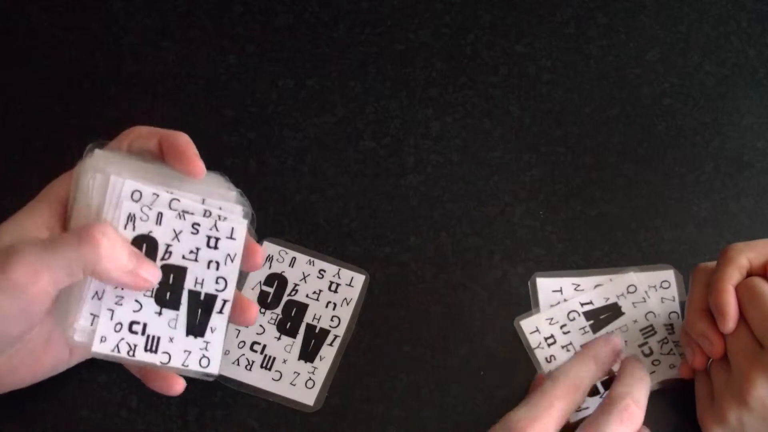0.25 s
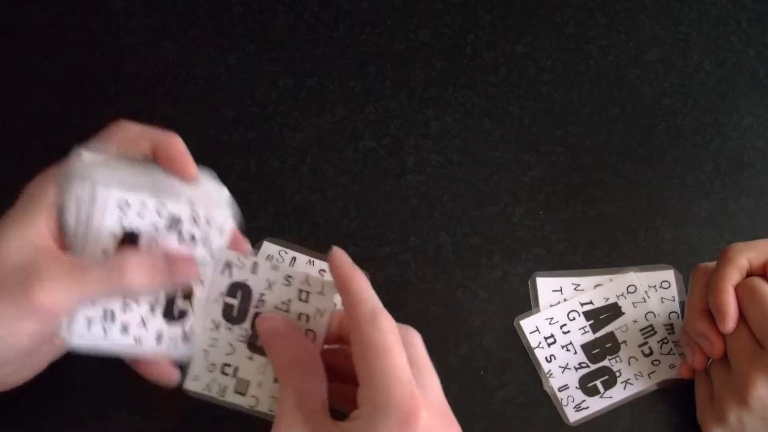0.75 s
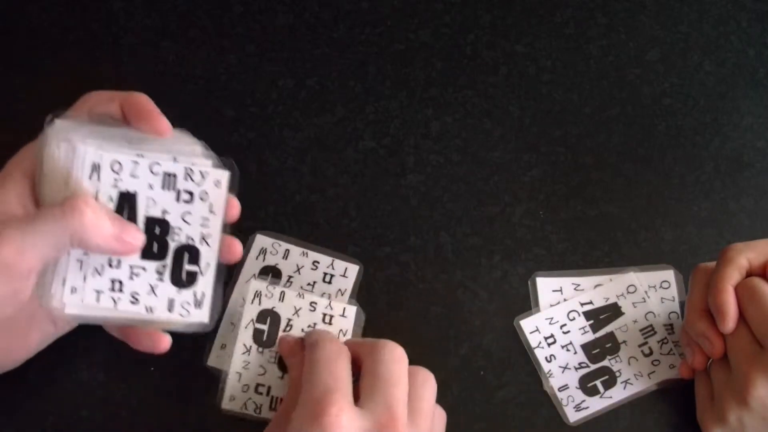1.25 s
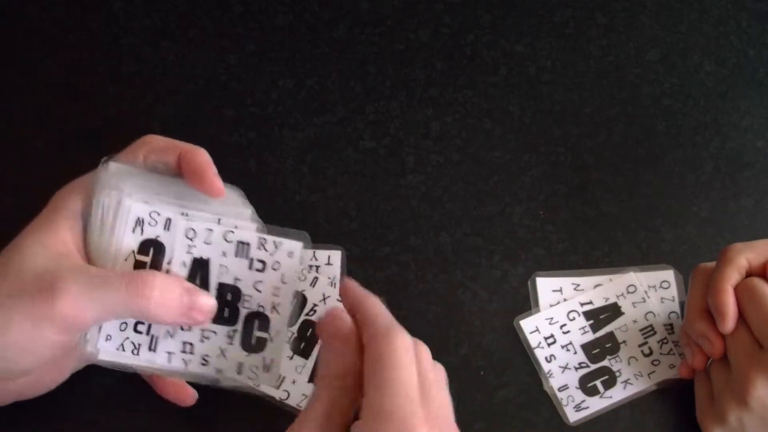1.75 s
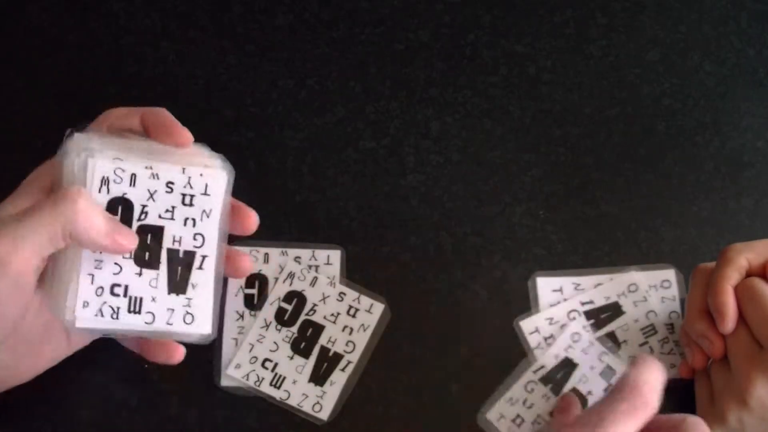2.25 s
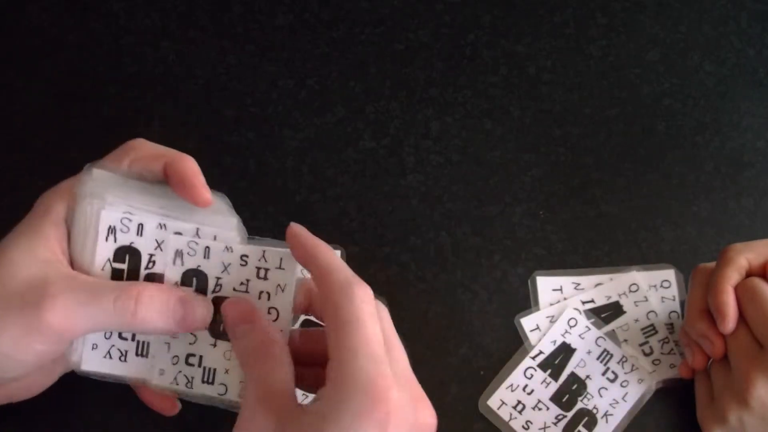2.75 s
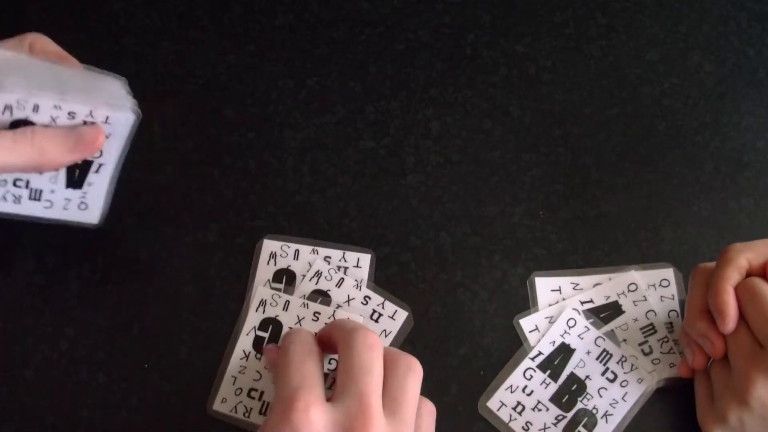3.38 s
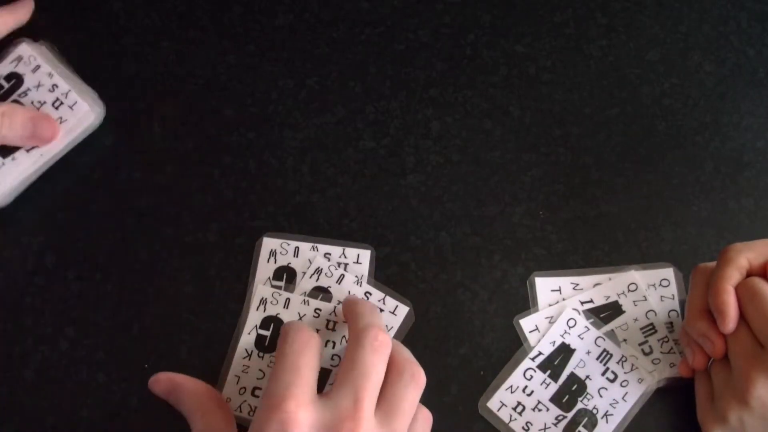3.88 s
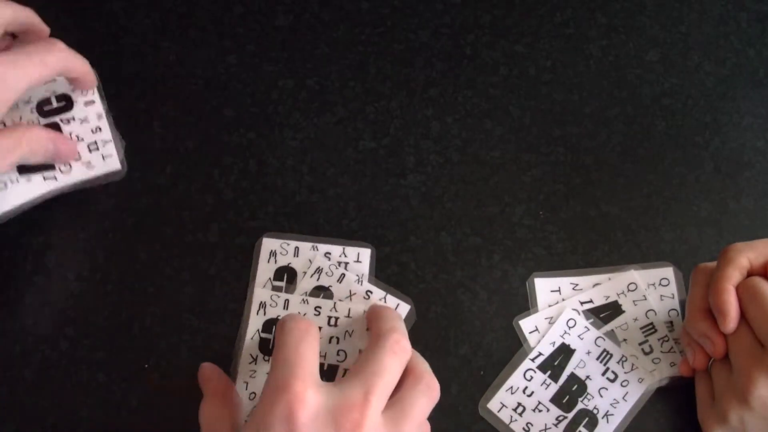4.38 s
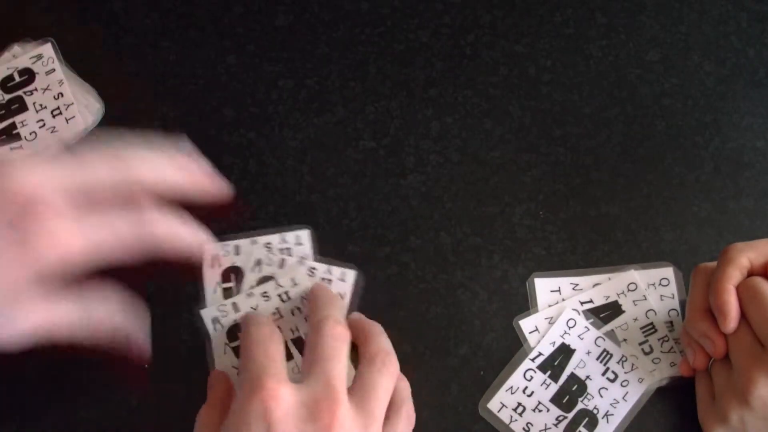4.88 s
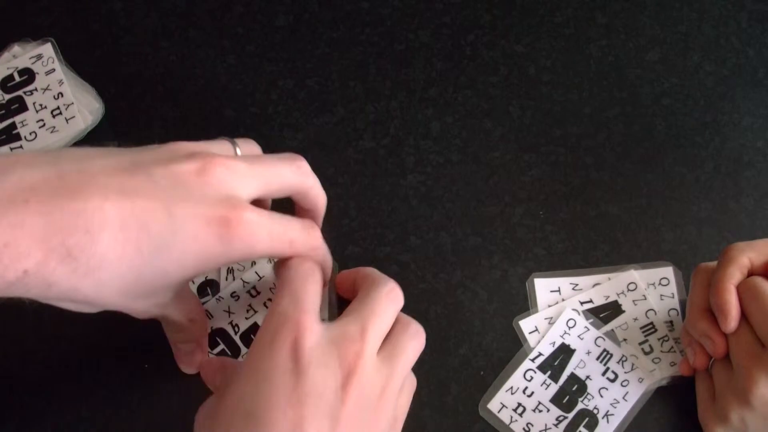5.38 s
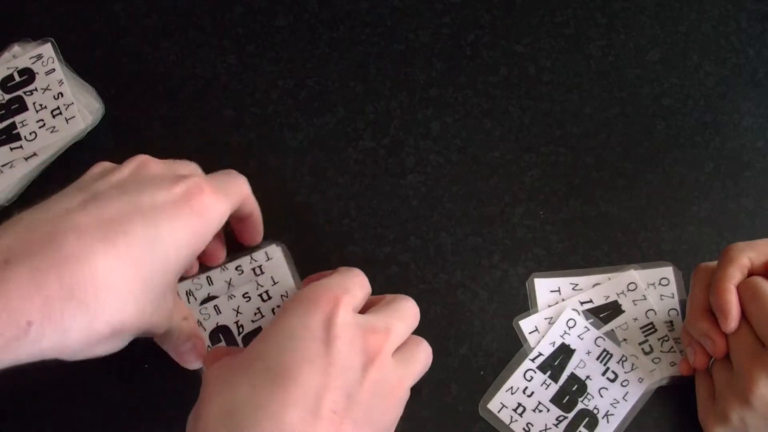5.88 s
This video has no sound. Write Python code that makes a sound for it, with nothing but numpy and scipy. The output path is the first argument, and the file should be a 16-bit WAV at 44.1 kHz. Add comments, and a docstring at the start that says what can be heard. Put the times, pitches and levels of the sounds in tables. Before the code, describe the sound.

Close and dry in a small room: brief glossy swishes and plastic snaps as cards leave a deck, papery flaps and bright clicks as they meet the table. Three quick clusters of dealing give way to sparse rubbing, a firm knock near five seconds, then dull shuffling and pressing of the pile. Barely noticeable squeaks and a low, even background hiss.

```python
"""Laminated cards are dealt from a hand-held deck onto a table, then slid together and squared up.
The place is a small room, the cards straight below a pair of microphones.
Stiff edges snap off the deck as short rim rings with cracks, and bent sheets ring in damped modes.
Cards and fingertips knock the table's modes; plastic faces rub in short strokes of filtered friction noise.
Sparse squeaks glide through, early and late reflections surround it all, and a soft steady hiss lies below."""
import sys
import numpy as np
from scipy import signal
from scipy.fft import rfft, irfft, next_fast_len
from scipy.io import wavfile

SR = 44100
rng = np.random.default_rng(int(sys.argv[2]) if len(sys.argv) > 2 else 0)


def transcribe(signal):
    """Save signal, clipped to [-1, 1], as a 16-bit WAV file at the path in sys.argv[1]."""
    frames = np.atleast_2d(signal).T
    limited = np.clip(frames, -1, 1)
    pcm = np.round(limited * 32767).astype(np.int16)
    wavfile.write(sys.argv[1], SR, pcm)


N = 270333
TIME = np.arange(N) / SR
BLOW_TIME = TIME[:SR // 7]   # time axis of one contact
CUTOFF_HZ = 16300   # top of the microphone signal
BAND_EDGES_HZ = np.geomspace(22, 17500, 25)
BANDS = [(np.sqrt(low * high), signal.butter(2, [low, high], "band", fs=SR, output="sos"))
         for low, high in zip(BAND_EDGES_HZ, BAND_EDGES_HZ[1:])]
SHEET_TO_EDGE = 0.424   # in a snap the sheet bends at this share of the edge's pitch
SOFT_EDGE_HZ = 3350     # rim pitch in pops and fingertip taps


def from_db(db):
    """Decibels to gain."""
    return 10 ** (np.asarray(db) / 20)


def rms_one(x):
    """Scale to rms 1."""
    return x / np.sqrt(np.mean(x ** 2) + 1e-20)


def at_hz(points, hz):
    """Read a table on a log-frequency axis."""
    table_hz, values = np.array(points).T
    return np.interp(np.log(hz), np.log(table_hz), values)


def cut(x, hz, kind):
    """Second-order low-pass or high-pass."""
    return signal.sosfilt(signal.butter(2, min(hz, .45 * SR), kind, fs=SR, output="sos"), x)


def drift(rate):
    """Random wander of spread near 1, with about rate new values a second joined by straight lines."""
    steps = rng.standard_normal(N // 8)
    return np.interp(TIME * rate, np.arange(len(steps)), steps)


def colour(x, spectrum):
    """Causal (minimum-phase) filter with the given spectrum, built by folding its cepstrum."""
    size = 2 * next_fast_len(x.shape[-1] // 2 + 512)
    hz = np.maximum(np.fft.rfftfreq(size, 1 / SR), 1)
    cepstrum = irfft(np.log(from_db(at_hz(spectrum, hz))))
    cepstrum[1:size // 2] *= 2
    cepstrum[size // 2 + 1:] = 0
    response = np.exp(rfft(cepstrum))
    return irfft(rfft(x, size) * response, size)[..., :x.shape[-1]]


def stereo_bands(likeness, size):
    """Yields (Hz, stereo noise) band by band, left and right as alike as the table says."""
    white = rng.standard_normal((2, 2, size))
    for k, (hz, sos) in enumerate(BANDS):
        mid, side = signal.sosfilt(sos, white[k % 2])   # neighbouring bands use separate noise
        alike = np.clip(at_hz(likeness, hz), -1, 1)
        yield hz, np.sqrt(1 + alike) * mid + np.sqrt(1 - alike) * side * [[1], [-1]]


def ring(hz, t60):
    """A struck mode: a sine that falls 60 dB in t60 seconds."""
    return np.sin(2 * np.pi * hz * BLOW_TIME) * from_db(-60 * BLOW_TIME / t60)


def crack(t60):
    """A decaying noise burst for the micro-slips where two hard edges meet."""
    return rng.standard_normal(len(BLOW_TIME)) * from_db(-60 * BLOW_TIME / t60)


def blow(x, db):
    """Give a short sound the energy of 5 ms at this level."""
    return from_db(db) * x / np.sqrt(np.sum(x ** 2) / (.005 * SR) + 1e-20)


def add(track, s, sound):
    """Mix a sound in at time s."""
    start = int(np.clip(round(s * SR), 0, N - 1))
    track[start:start + len(sound)] += sound[:N - start]


# steady hiss, its spectrum: [f/Hz, level/dB]
HISS_SPECTRUM = [(15, -61), (25, -32.5), (53, -29), (114, -13), (242, -8), (301, -5), (714, -2),
                 (818, -4.5), (962, -4), (1650, -7), (2610, -13), (3820, -13.5), (5880, -17.5),
                 (12500, -20.5), (16000, -33)]
# its likeness between the two microphones: [f/Hz, correlation]
HISS_LIKENESS = [(60, -0.51), (180, -0.74), (550, -0.59), (1650, -0.31), (4970, -0.044), (15000, 0.062)]


def background(level_db):
    """Steady hiss of the room and the microphones: noise weighted band by band, partly shared by both sides."""
    noise = 0
    for hz, band in stereo_bands(HISS_LIKENESS, N):
        noise = noise + from_db(at_hz(HISS_SPECTRUM, hz)) * band
    return from_db(level_db) * rms_one(noise)


def friction(catches_per_s, size_db, smooth_db):
    """Tiny catches of uneven size over smooth rubbing; the finger pressure judders by about a decibel."""
    sizes = from_db(size_db * np.minimum(rng.exponential(1, N), 4))
    signed_sizes = sizes * rng.choice([-1, 1], N)
    grains = signed_sizes * (rng.random(N) < catches_per_s / SR)
    smooth = from_db(smooth_db) * rng.standard_normal(N)
    return (rms_one(grains) + smooth) * from_db(drift(130))


# one card slides over another: [t/s of fastest motion, length/s, hiss level/dB, tilt/dB per octave]
CARD_STROKES = [(0.01, 0.04, -59, 1), (0.175, 0.39, -70.5, 0), (0.459, 0.15, -71, 1),
                (0.78, 0.19, -61.5, 2), (0.846, 0.04, -57, -2), (0.897, 0.026, -53.5, -9),
                (0.94, 0.14, -63, 2), (1.011, 0.031, -45.5, 0.5), (1.441, 0.038, -60, -1),
                (1.504, 0.062, -51, -7.5), (1.649, 0.054, -63.5, -9), (2.023, 0.064, -49, 2.5),
                (2.193, 0.039, -55, 0), (2.235, 0.094, -56, -4), (2.257, 0.015, -37.5, -3),
                (2.267, 0.026, -42.5, 3), (2.31, 0.053, -57, -6), (2.653, 0.23, -68, 1),
                (2.794, 0.057, -60, 0), (2.95, 0.045, -50, 1), (3.02, 0.026, -46.5, -7),
                (3.045, 0.036, -43.5, 5.5), (3.129, 0.11, -61, 1), (3.361, 0.079, -61.5, -5),
                (3.456, 0.038, -56.5, -5.5), (3.632, 0.17, -56.5, -3), (3.725, 0.06, -55.5, 3),
                (3.832, 0.025, -40.5, -1.5), (4.112, 0.06, -64.5, 2), (4.459, 0.17, -65.5, -4),
                (4.755, 0.25, -66.5, -12), (4.911, 0.14, -63.5, 7), (5.316, 0.075, -57, -4.5),
                (5.4, 0.08, -67, 2), (5.469, 0.09, -65, -12), (5.678, 0.13, -58, -11),
                (5.823, 0.096, -58, -11.5), (5.89, 0.23, -59.5, -2.5), (6.094, 0.072, -55.5, -7)]
# papery rub of the sheet: [f/Hz, level/dB per Hz]
RUB_SPECTRUM = [(100, -6.5), (200, -2), (400, -5.5), (700, -2), (1300, -1), (2000, 4), (3000, -11.5),
                (6000, -31.5)]
# hiss of the glossy surface: [f/Hz, level/dB per Hz]
GLOSS_SPECTRUM = [(1000, -32.5), (2000, 5.5), (3200, 4), (5000, 0.5), (8000, 1), (12000, -4.5),
                  (14000, -8.5), (16500, -21)]


def slides(rub_db, rub_per_tilt):
    """Card slides on card, speeding up and slowing down: the sheet radiates a rub, the glossy surface a hiss."""
    grain = friction(catches_per_s=1800, size_db=5.5, smooth_db=1.0)
    rub = rms_one(colour(grain, RUB_SPECTRUM))
    hiss = rms_one(colour(grain, GLOSS_SPECTRUM))
    out = np.zeros(N)
    for s, length, db, tilt in CARD_STROKES:
        half = length / 2   # speeding up takes as long as slowing down
        span = np.flatnonzero(np.abs(TIME - s) < 3 * half)
        phase = (TIME[span] - s) / half
        speed = from_db(-10 * np.abs(phase) ** 1.5)
        tilted_hiss = rms_one(colour(hiss[span], [(3000, -tilt), (12000, tilt)]))
        papery_rub = from_db(rub_db + rub_per_tilt * tilt) * rub[span]   # dull strokes rub more
        out[span] += from_db(db) * speed * (tilted_hiss + papery_rub)
    return out


# table top: [f/Hz, level/dB, t60/s]
TABLE_TOP = [(133, -11.5, 0.11), (228.6, 2.5, 0.045), (291, -5.5, 0.14), (331, -2.5, 0.042),
             (504, 1, 0.045), (683, -2.5, 0.029)]


def table_thud(spread_db, bass_hz):
    """Table modes ring with slightly random strengths; the soft contact rounds the start."""
    modes = 0
    for k, (hz, db, t60) in enumerate(TABLE_TOP):
        strength = from_db(db + spread_db * rng.normal())
        modes = modes + (-1) ** k * strength * ring(hz, t60)
    return cut(cut(modes, 1060, "low"), bass_hz, "high")


def table(db, bass_hz):
    """The table's answer to one contact, with its bass reduced below bass_hz."""
    return blow(table_thud(spread_db=1.5, bass_hz=bass_hz), db)


def sheet_flex(hz, t60, lower_db, upper_db, slap_db):
    """A released card swings in a well damped bending mode with a neighbour on either side, and slaps the air."""
    lower = from_db(lower_db) * ring(0.645 * hz, t60)
    upper = from_db(upper_db) * ring(1.72 * hz, 1.3 * t60)
    modes = ring(hz, t60) - lower - upper
    slap = cut(cut(crack(0.015), 1920, "low"), 600, "high")
    return cut(rms_one(modes) + from_db(slap_db) * rms_one(slap), 338, "high")


def sheet(hz, db):
    """The bending of the whole card."""
    return blow(sheet_flex(hz, t60=0.016, lower_db=-11.5, upper_db=-12, slap_db=-4.5), db)


def edge_click(hz, t60, grit_db, lower_db):
    """The stiff plastic rim rings for a few cycles, with a weaker mode below it, over a gritty crack."""
    rim = ring(hz, t60) - from_db(lower_db) * ring(0.74 * hz, t60)
    grit = cut(cut(crack(0.0023), 6200, "low"), 1800, "high")
    return cut(rms_one(rim) + from_db(grit_db) * rms_one(grit), 2060, "high")


# card rim, upper modes: [multiple of the lowest mode, level/dB]
RIM_UPPER_MODES = [(1.52, 14), (2.03, -16), (2.85, 2)]
# thin crack: [f/Hz, level/dB per Hz]
TICK_SPECTRUM = [(2500, -79), (5000, -2), (7000, 1.5), (8500, 4), (10000, -1), (12000, 2), (14500, -9),
                 (16500, -16)]


def bright_tick(hz, t60, ring_db):
    """A hard contact adds a thin crack and wakes the rim's upper modes."""
    upper = 0
    for ratio, db in RIM_UPPER_MODES:
        upper = upper + from_db(db) * ring(min(hz * ratio, CUTOFF_HZ), t60)
    thin_crack = rms_one(colour(crack(t60=0.003), TICK_SPECTRUM))
    return cut(thin_crack + from_db(ring_db) * rms_one(upper), 4100, "high")


# gritty skid of the rim: [f/Hz, level/dB per Hz]
SKID_SPECTRUM = [(600, -19), (2000, 4.5), (3200, -15), (5000, -2.5), (8000, 4), (12500, -1.5), (16000, -16)]


def edge(hz, db, tick_db):
    """The rim's click, the bright tick on top of it and the short gritty skid that follows."""
    # ticks above a middling -37.5 dB are brighter, those below it duller
    top_db = np.clip(1.2 * (tick_db + 37.5), -5, 5)
    click = edge_click(hz, t60=0.0063, grit_db=-5, lower_db=-26)
    tick = colour(bright_tick(hz, t60=0.006, ring_db=-5.5), [(7000, 0), (12000, top_db)])
    skid_rise = 1 - np.exp(-BLOW_TIME / 0.0027)
    skid = colour(crack(t60=0.092), SKID_SPECTRUM) * skid_rise
    return blow(click, db) + blow(tick, tick_db) + blow(skid, tick_db - 8.5)


# a fingertip comes down on the pile; the first row is a low thump as the scene opens: [t/s, table level/dB]
FINGER_TAPS = [(0.008, -60.5), (2.2168, -53.5), (2.3199, -55), (3.85, -49.5), (4.7331, -57),
               (5.2225, -53.5), (5.3032, -44), (5.5034, -51.5), (5.7238, -52.5)]


def taps():
    """A soft knock on the table through the pile that hardly wakes the rims, mostly from a fingertip."""
    out = np.zeros(N)
    for s, db in FINGER_TAPS:
        add(out, s, table(db, bass_hz=104))
        add(out, s, sheet(720, db - 6))
        add(out, s, edge(SOFT_EDGE_HZ, db - 30, db - 17))
    return out


def catches(per_s, mean_db, spread_db, low_hz, high_hz, sheet_db, tick_db):
    """Corners catch at random while cards slide: at most two tiny snaps a stroke, likelier the longer it lasts."""
    out = np.zeros(N)
    for s, length, _, _ in CARD_STROKES:
        for chance, place, size, pitch in rng.random((2, 4)):
            if chance >= per_s * length / 2:
                continue
            level = mean_db + spread_db * (2 * size - 1)
            hz = low_hz * (high_hz / low_hz) ** pitch
            snap = edge(hz, level, level + tick_db) + sheet(SHEET_TO_EDGE * hz, level + sheet_db)
            add(out, s + length * (place - .5), snap)
    return out


# an edge slips off another card: [t/s, edge level/dB, edge f/Hz, sheet level/dB, bright tick level/dB]
EDGE_SNAPS = [(0.1944, -56, 5400, -73, -60), (0.8176, -47.5, 4140, -36.5, -44),
              (0.8735, -48, 3100, -69, -49), (1.0001, -41, 3700, -50, -64), (1.0115, -39.5, 7030, -60, -51),
              (1.2333, -58, 4860, -69, -72), (1.4743, -43, 3100, -48, -56), (1.4986, -51, 3300, -60, -68),
              (1.6398, -53.5, 3430, -72, -80), (2.0414, -52, 3100, -45, -57),
              (2.0445, -44.5, 4030, -47.5, -59), (2.155, -42.5, 2760, -40, -52.5),
              (2.1797, -55, 3600, -51, -68), (2.4078, -45.5, 3560, -64, -71),
              (2.951, -43.5, 3100, -41, -68), (3.0074, -46, 2670, -44, -52), (3.0228, -41, 4090, -42, -41),
              (3.3593, -50.5, 2880, -66, -49), (3.6143, -48, 3170, -51.5, -69),
              (3.745, -50, 3970, -52, -66), (3.831, -39.5, 5560, -61, -55), (4.3772, -50, 2630, -58, -48.5)]


def snaps():
    """An edge springs free: the shorter the free part, the higher both rim and sheet ring."""
    out = np.zeros(N)
    for s, db, hz, sheet_db, tick_db in EDGE_SNAPS:
        add(out, s, edge(hz, db, tick_db))
        add(out, s, sheet(SHEET_TO_EDGE * hz, sheet_db))
        add(out, s, table(db - 21.5, bass_hz=300))
    return out


# sliding squeaks: [t/s of fastest motion, half length/s, level/dB, start f/Hz, end f/Hz]
CARD_SQUEAKS = [(0.425, 0.047, -69, 8180, 8600), (0.771, 0.012, -47.5, 1380, 1440),
                (4.352, 0.27, -65.5, 2230, 2194), (6.01, 0.085, -62.5, 5500, 4150)]


def squeaks(width_hz):
    """Plastic sticks and slips almost regularly: a faint, broken line glides as the card's free length changes."""
    out = np.zeros(N)
    for s, half, db, start_hz, end_hz in CARD_SQUEAKS:
        hz = np.interp(TIME, [s - half, s + half], [start_hz, end_hz])
        speed = np.exp(-np.minimum(((TIME - s) / half) ** 2, 20))
        line = np.sin(2 * np.pi * np.cumsum(hz) / SR)
        out += from_db(db) * speed * drift(width_hz) * drift(60) * line
    return out


# a card bends and pops as it is drawn off the deck: [t/s, sheet level/dB, sheet f/Hz, bright tick level/dB]
SHEET_POPS = [(0.6192, -54, 823, -64.5), (0.7126, -53.5, 1270, -69), (0.817, -34, 660, -42.5),
              (0.8489, -37.5, 1330, -52), (0.8879, -40, 1460, -52), (0.893, -37.5, 1250, -68),
              (1.9666, -46, 1110, -56), (2.7, -47.5, 1040, -67), (2.7061, -51, 1377, -62),
              (2.7578, -40, 940, -47.5), (2.789, -43.5, 1220, -69), (2.8409, -52.5, 1161, -80),
              (2.934, -49, 800, -68), (3.5117, -54.5, 630, -60.5)]


def pops():
    """A bent card springs back: mostly sheet, with a little rim and table."""
    out = np.zeros(N)
    for s, db, hz, tick_db in SHEET_POPS:
        add(out, s, sheet(hz, db))
        add(out, s, edge(SOFT_EDGE_HZ, db - 24, tick_db))
        add(out, s, table(db - 27.5, bass_hz=335))
    return out


# a card is slapped or pressed onto the table:
# [t/s, table level/dB, sheet level/dB, sheet f/Hz, edge level/dB, edge f/Hz, bright tick level/dB]
TABLE_SLAPS = [(1.0157, -50.5, -49, 1500, -44.5, 5800, -48), (1.5173, -36.5, -44, 820, -44.5, 3900, -43),
               (1.9396, -57, -44, 914, -44, 4020, -47), (2.2558, -62, -35, 2255, -35.5, 3200, -38),
               (2.2602, -36.5, -29, 1815, -27.5, 3090, -31), (3.0294, -62, -36, 1823, -30.5, 3150, -27),
               (3.0322, -35, -41.5, 1031, -34.5, 3970, -48), (3.1915, -44, -48.5, 1760, -36, 4355, -45.5),
               (3.215, -31.5, -42.5, 800, -41, 4800, -50.5), (3.3795, -53.5, -56.5, 1694, -53, 3660, -66),
               (3.8646, -50, -54, 815, -47, 2690, -46), (5.1038, -32.5, -41, 814, -37.5, 4420, -40),
               (5.9059, -48, -49, 1150, -48.5, 3350, -45.5)]


def slaps(heavy_bass_hz, light_bass_hz):
    """A card meets the table: flapping down it gives less bass than pressed by a finger."""
    out = np.zeros(N)
    for s, table_db, sheet_db, sheet_hz, edge_db, edge_hz, tick_db in TABLE_SLAPS:
        lightness = np.clip((sheet_db - table_db + 5) / 10, 0, 1)
        bass_hz = heavy_bass_hz + (light_bass_hz - heavy_bass_hz) * lightness
        add(out, s, edge(edge_hz, edge_db, tick_db) + sheet(sheet_hz, sheet_db))
        add(out, s + 0.00032, table(table_db, bass_hz))   # the table answers a moment later
    return out


# the pile is dragged over the table under the fingers: [t/s, table rumble level/dB]
PILE_DRAG = [(3.3, -92), (3.7, -73.5), (4.2, -85), (4.76, -75.5), (5.55, -67.5), (5.9, -67), (6.13, -81)]


def table_drag():
    """Friction under the pressed pile shakes the same table modes that the knocks do."""
    grain = friction(catches_per_s=1200, size_db=3.0, smooth_db=-1.5)
    thud = table_thud(spread_db=0.5, bass_hz=193.0)
    rumble = rms_one(signal.fftconvolve(grain, thud)[:N])
    drag_s, drag_db = np.transpose(PILE_DRAG)
    return from_db(np.interp(TIME, drag_s, drag_db)) * rumble


# likeness of the reflections at the two microphones: [f/Hz, correlation]
ECHO_LIKENESS = [(150, 0.83), (500, 0.55), (2000, 0.79), (6000, 0.27), (12000, -0.37)]
# decay of the room, held to at least 0.02 s where used: [f/Hz, t60/s]
ROOM_DECAY = [(100, 1.5), (300, -0.18), (800, 0.48), (3000, 0.13), (8000, 0.55), (15000, -0.04)]
# strength of the reflections: [f/Hz, level/dB]
ECHO_SPECTRUM = [(60, -5), (250, -5.5), (700, 0.5), (2000, 0), (8000, -2), (16000, 4)]


def room(x, wet_db, first_echo_s, near_db, near_t60):
    """Near surfaces throw back a dense burst; the room's own decay lies behind it, band by band."""
    t = TIME[:SR // 2]
    near = from_db(near_db - 60 * t / near_t60)
    onset = np.clip(t / first_echo_s - 1, 0, 1)   # silent until the first echo
    tail = 0
    for hz, noise in stereo_bands(ECHO_LIKENESS, len(t)):
        far = from_db(-60 * t / max(at_hz(ROOM_DECAY, hz), .02))
        band = rms_one(noise * np.hypot(near, far) * onset)
        tail = tail + from_db(at_hz(ECHO_SPECTRUM, hz)) * np.sqrt(hz) * band   # wider bands hold more energy
    tail = rms_one(tail) / np.sqrt(len(t))
    return from_db(wet_db) * signal.fftconvolve(x[None], tail, axes=1)[:, :N]


def scene():
    """The cards lie straight below the microphones, so the direct sound is the same on both sides."""
    rubbing = slides(rub_db=-7, rub_per_tilt=-0.59) + squeaks(width_hz=460) + table_drag()
    corner_catches = catches(per_s=7, mean_db=-68.5, spread_db=4, low_hz=2710, high_hz=5300,
                             sheet_db=3, tick_db=2)
    clicks = taps() + corner_catches + snaps() + pops() + slaps(heavy_bass_hz=75, light_bass_hz=296)
    reflections = room(clicks + from_db(0.5) * rubbing, wet_db=-4, first_echo_s=0.0011,
                       near_db=15, near_t60=0.15)
    # the bass below about 90 Hz is thinned out
    cards = cut(clicks + rubbing + reflections, 89, "high")
    return cards + background(level_db=-58.5)


def record(dry):
    """The top is cut steeply by an elliptic low-pass."""
    return signal.sosfilt(signal.ellip(10, .2, 80, CUTOFF_HZ, fs=SR, output="sos"), dry)


dry = scene()
out = record(dry)
transcribe(out)
```